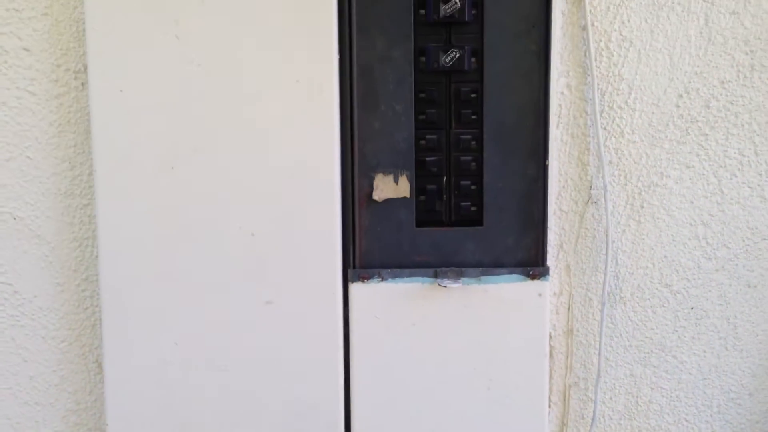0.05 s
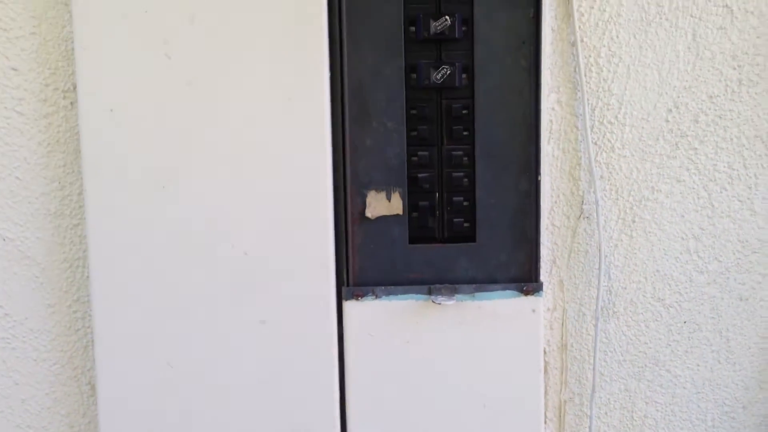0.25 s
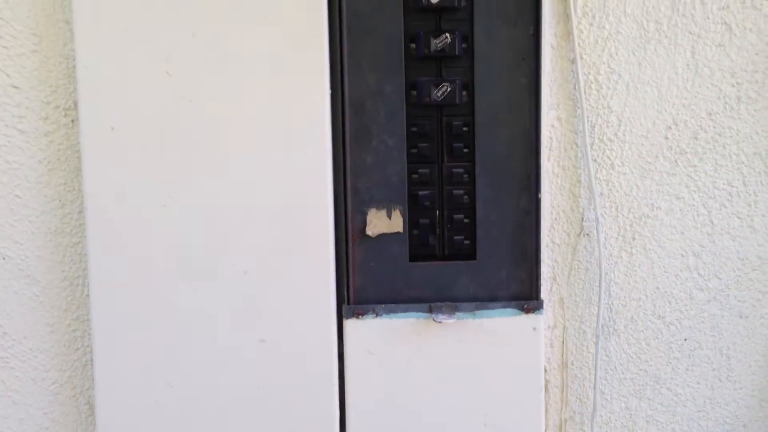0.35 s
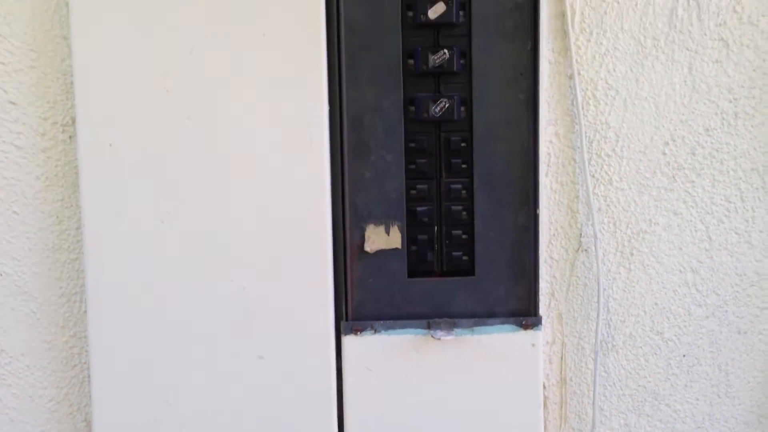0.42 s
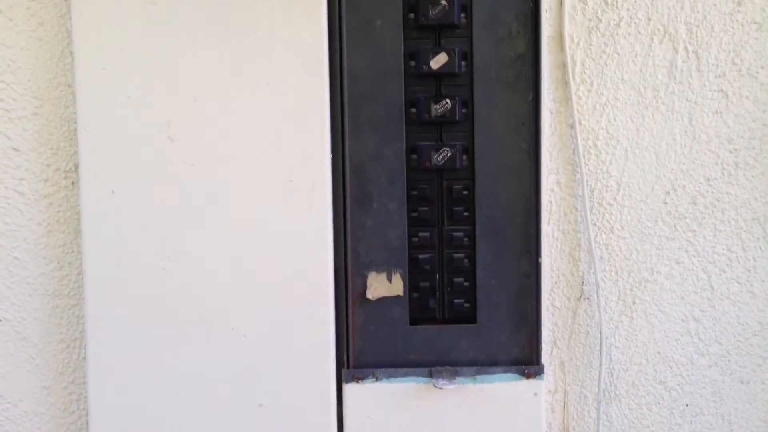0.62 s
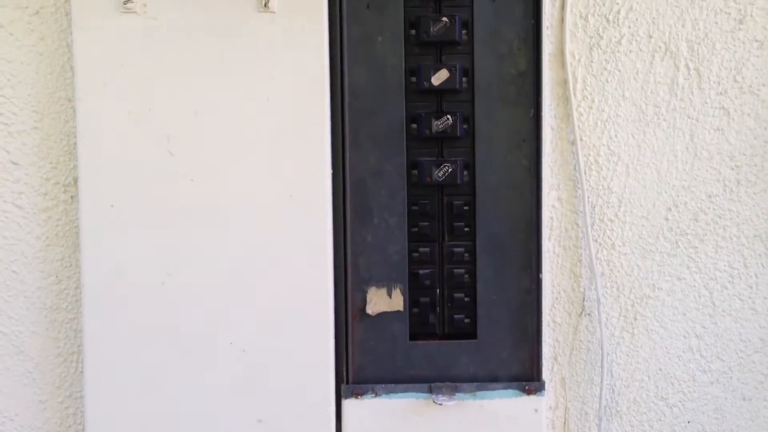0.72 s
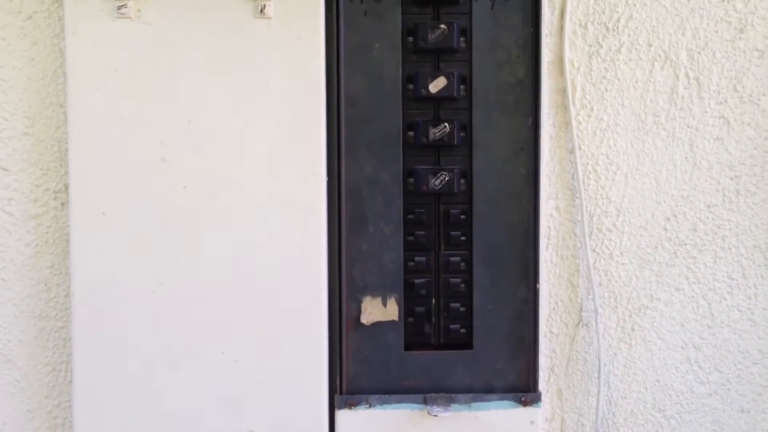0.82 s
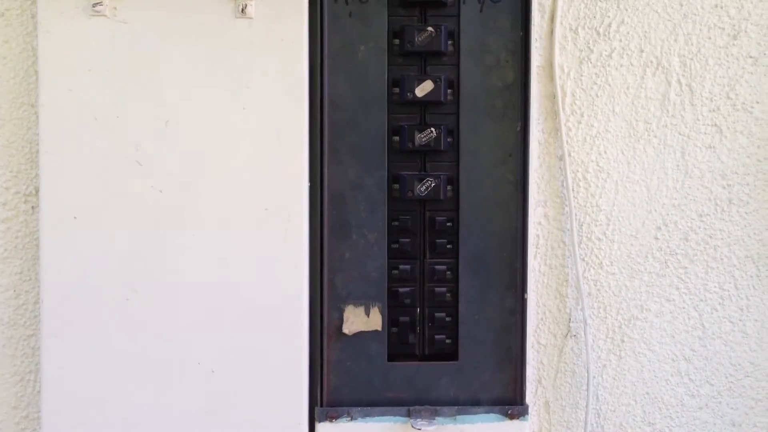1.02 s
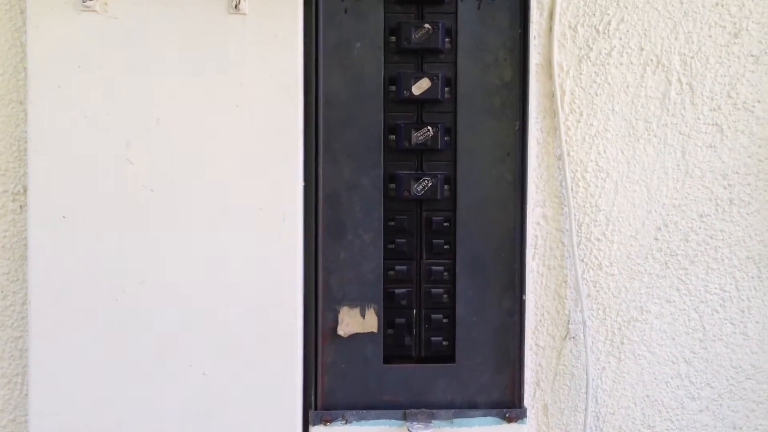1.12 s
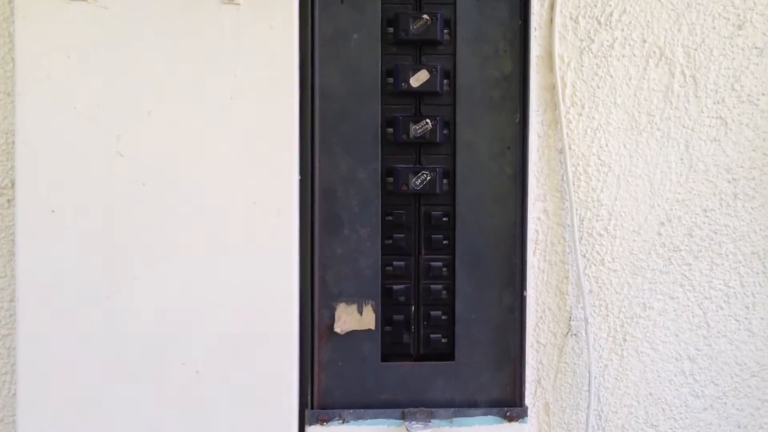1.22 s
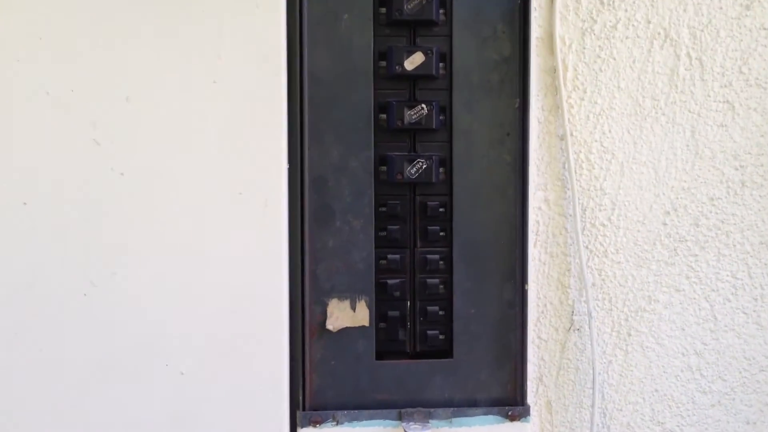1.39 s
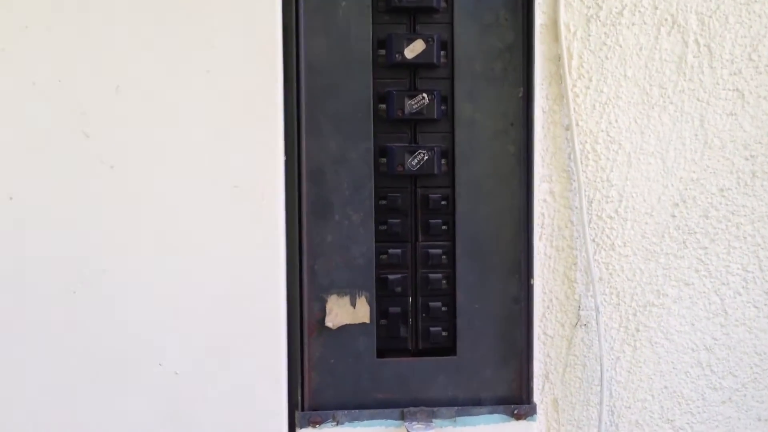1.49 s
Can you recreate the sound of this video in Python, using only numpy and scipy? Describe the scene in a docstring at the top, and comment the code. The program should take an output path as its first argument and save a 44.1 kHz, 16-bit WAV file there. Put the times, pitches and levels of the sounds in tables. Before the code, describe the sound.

A catch in a steel breaker panel snaps home with one sharp, bright clack, ringing high as the box briefly rattles. Very faint handling scuffs follow. The panel is close, with quiet outdoor air and distant traffic behind.

```python
"""A part snaps home in a steel breaker panel on an outside wall. First a faint tick sounds in quiet outdoor
air, over distant traffic and the wavering drone of a far engine. At 0.23 s the stiff catch gives a bright
double snap and rings high; just after, the sheet-steel box takes the blow and rattles for a moment. As it dies
away, faint scuffs of handling follow, and near 0.8 s low hums of the far engine swell up a little."""
import sys
import numpy as np
from scipy import signal
from scipy.fft import rfft, irfft, next_fast_len
from scipy.io import wavfile
from scipy.ndimage import uniform_filter1d, map_coordinates

SR = 44100
rng = np.random.default_rng(int(sys.argv[2]) if len(sys.argv) > 2 else 0)


def wav_out(sig):
    """Save sig, one row per channel (or a flat mono array), as 16-bit PCM at SR to the path in sys.argv[1]."""
    wavfile.write(sys.argv[1], SR, np.round(np.clip(np.atleast_2d(sig).T, -1, 1) * 32767).astype(np.int16))


N = 68355

# hits of the catch (t/s, level/dB)
CATCH_HITS = [(.2305, -25), (.2316, -19), (.2337, -20), (.2463, -36), (.2722, -43), (.2842, -37)]
# ringing modes of the catch (f/Hz, level/dB, t60/s)
CATCH_MODES = [(4823, -7, .13), (4895, -8, .13), (5233, -2, .11), (5542, -26, .32), (5762, -13, .15),
               (6182, 0, .115), (6745, -17, .16), (7230, -16, .12), (7390, -14, .12), (8559, -20, .1)]
# EQ of its crack and of its sizzling tail (f/Hz, level/dB)
CRACK_EQ = [(100, -45), (1000, -34), (1800, -23), (3000, -30), (4000, -25), (4900, -3), (5800, 0),
            (6500, -2), (7400, -11), (8500, -25), (12500, -24), (16000, -42)]
SIZZLE_EQ = [(60, -25), (200, 0), (1000, -18.5), (1800, -4), (3600, -12), (5000, -5.5), (7200, 0.5),
             (9800, -15.5), (11800, 1), (14000, -12), (16000, -50)]
def catch(crack_db=16, sizzle_db=-11.5, ring_db=-6.5):
    """The small stiff catch cracks on each contact and rings high."""
    def snap(db):
        crack = amp(crack_db) * hardness(db, CATCH_HITS) * transient(CRACK_EQ, t60=0.0024)
        return crack + amp(sizzle_db) * steel_tail(SIZZLE_EQ)
    snaps = play(CATCH_HITS, snap)
    return snaps + amp(ring_db) * ring(CATCH_MODES, CATCH_HITS, fill_s=.0015, scatter_db=1.5)


# blows on the box (t/s, level/dB)
BOX_HITS = [(.2466, -25.5), (.2510, -32), (.2570, -30), (.2726, -28.5), (.2848, -29), (.2890, -34)]
# ringing modes of the box (f/Hz, level/dB, t60/s)
BOX_MODES = [(226, -5, .24), (305, -13, .25), (418, -6, .18), (498, -11, .2), (786, -12, .2),
             (1050, 3, .11), (1168, -25, .9), (1404, -14, .22), (1901, -5, .17), (2108, -4, .12),
             (2256, -18, .38), (2453, -3, .11), (2620, -7, .11), (2879, -5, .12), (3143, -4, .12),
             (3772, -4, .12), (4110, -10, .13)]
# EQ of its clank and of its sheet-metal tail (f/Hz, level/dB)
CLANK_EQ = [(100, -46), (400, -42), (1200, -18.5), (2400, 2), (3400, -4), (4600, -12.5), (6500, -5.5),
            (9000, -26), (16000, -47)]
SHEET_EQ = [(40, -43), (130, 5.5), (400, 2), (650, 0.5), (1250, -4), (2000, 4), (2800, 0), (4200, -2.5),
            (6300, 2.5), (9500, -14.5), (13000, -32), (16000, -45)]
def box(clank_db=22, sheet_db=-5, ring_db=-7.5, attack_s=0.0018):
    """Each blow clanks, then spreads through the sheet steel and gives the snap its body."""
    attack = 1 - np.exp(-np.arange(N) / SR / attack_s)
    def blow(db):
        clank = amp(clank_db) * hardness(db, BOX_HITS) * transient(CLANK_EQ, t60=0.0036)
        return clank + amp(sheet_db) * attack * steel_tail(SHEET_EQ)
    rattle = play(BOX_HITS, blow)
    return rattle + amp(ring_db) * ring(BOX_MODES, BOX_HITS, fill_s=.022, scatter_db=1.0)


def transient(eq, t60):
    """One contact, energy 1: a clean click and, equally strong, the grit of rough surfaces."""
    grit = rng.standard_normal(N) * fade(np.arange(N) / SR, t60)
    push = signal.unit_impulse(N) + grit / np.linalg.norm(grit)
    hit = minimum_phase(push, eq)
    return hit / np.linalg.norm(hit)


def hardness(db, hits):
    """Transient gain: a soft hit loses an extra half dB of bite per dB below the hardest."""
    return amp(.5 * (db - max(level for s, level in hits)))


def ring(modes, hits, fill_s, scatter_db):
    """Every hit feeds energy into the modes, which then ring out."""
    t = np.arange(N) / SR
    push = t * fade(t, fill_s)
    energy = play(hits, lambda db: amp(db) * push / push.sum())
    out = np.zeros(N)
    for hz, db, t60 in modes:
        stored = signal.lfilter([1], [1, -fade(2 / SR, t60)], energy)
        envelope = amp(db - scatter_db * rng.standard_normal()) * np.sqrt(stored)
        out += envelope * np.sin(2 * np.pi * (hz * t + rng.random()))
    return out


# decay time of steel across the spectrum (f/Hz, t60/s)
STEEL_DECAY = [(100, 0.15), (400, 0.24), (2000, 0.17), (6000, 0.11), (12000, 0.07)]
def steel_tail(eq):
    """Countless weak modes of steel blur into a noisy tail; the highs die first."""
    hz, t, spectrum = signal.stft(noise(eq), SR, nperseg=256)
    decay = fade(t, along(STEEL_DECAY, hz)[:, None])
    return signal.istft(spectrum * decay, SR, nperseg=256)[1][:N]


# light touches before the snap (t/s, level/dB)
TICK_HITS = [(.0336, -51), (.0360, -27), (.0408, -36)]
# their thin, bright EQ (f/Hz, level/dB)
TICK_EQ = [(300, -30), (1500, -26), (2800, -11), (4500, -22), (7300, 0), (9500, -16), (15000, -38)]
def tick(tail_db=-31.5):
    """Light touches run together into one tick with a trace of steel ring."""
    return play(TICK_HITS, lambda db: transient(TICK_EQ, t60=0.0028) + amp(tail_db) * steel_tail(TICK_EQ))


# handling after the snap (t/s, length/s, level/dB)
SCUFF_CUES = [(.448, .012, -72), (.59, .010, -68), (.615, .015, -72), (.712, .015, -69), (.775, .025, -69),
              (.858, .008, -66), (1.132, .012, -70), (1.372, .008, -68), (1.462, .04, -66)]
# EQ of the scuffs (f/Hz, level/dB)
SCUFF_EQ = [(500, -19), (2000, 1), (4500, 4), (7500, 1), (15000, -22)]
def scuffs():
    """Faint handling: short, soft-edged swells of bright noise."""
    t = np.arange(N) / SR
    envelope = sum(amp(db) * np.exp(-2 * ((t - s) / length) ** 2) for s, length, db in SCUFF_CUES)
    return noise(SCUFF_EQ) * envelope


# pitch and level ride of the far engine (t/s, f/Hz, level/dB)
ENGINE_RIDE = [(0, 200, -52), (.09, 200.1, -56.5), (.18, 206.1, -83), (.30, 220, -54), (.38, 211.2, -52),
               (.52, 211.1, -51), (.68, 217.9, -60), (.82, 232, -60.5), (.98, 224.7, -51.5),
               (1.15, 224, -63.5), (1.36, 229, -53.5), (1.55, 232.5, -70)]
def engine(octave_db=-14, waver_db=1.0, jitter_hz=1.52):
    """A far engine drones on one wavering note with a weak octave."""
    hz, db = curves(ENGINE_RIDE)
    phase = 2 * np.pi * np.cumsum(hz + jitter_hz * wobble(25)) / SR
    tone = unit(np.sin(phase) + amp(octave_db) * np.sin(2 * phase))
    return amp(db + waver_db * wobble(18)) * tone


# three fader points of the hums (t/s)
HUM_CUES = [0.783, 0.89, 1.68]
# low hums of the far engine (f/Hz, then level/dB at each fader point)
ENGINE_HUMS = [(75.6, -84, -75.5, -67), (149.76, -73, -60.5, -68.5)]
def engine_hums(jitter_hz=2, waver_db=2):
    """The far engine's lower notes fade up as low, unsteady hums."""
    out = np.zeros(N)
    for hz, *levels in ENGINE_HUMS:
        phase = 2 * np.pi * np.cumsum(hz + jitter_hz * wobble(19.5)) / SR
        fader_db = np.interp(np.arange(N) / SR, HUM_CUES, levels)
        out += unit(np.sin(phase)) * amp(fader_db + waver_db * wobble(14))
    return out


# EQ of the outdoor bed (f/Hz, level/dB)
AIR_EQ = [(15, -68), (25, -21), (43, -29.5), (64, -21.5), (114, -15.5), (141, -13.5), (185, -4.5),
          (223, -6), (363, -13.5), (591, -12.5), (714, -15), (840, -11.5), (2610, -29.5), (14400, -38.5),
          (16000, -43)]
# swell of traffic in its lows and mids (t/s, level/dB)
TRAFFIC_RIDE = [(0, -0.5), (.2, 0.5), (.45, 1.5), (.7, 1.5), (1.1, 0), (1.55, 2.5)]
def outdoor_air(level_db=-55, patchy_db=1.5, crossover_hz=2500):
    """A bed of open air, patchy in time and pitch, that swells with distant traffic."""
    spectrum = signal.stft(noise(AIR_EQ), nperseg=512)[2]
    patches = uniform_filter1d(rng.standard_normal(spectrum.shape), size=5, axis=0)
    patches = unit(uniform_filter1d(patches, size=14, axis=1))
    air = unit(signal.istft(spectrum * amp(patchy_db * patches), nperseg=512)[1][:N])
    low = filtered(air, lambda hz: 1 / (1 + (hz / crossover_hz) ** 2))
    swell = amp(curves(TRAFFIC_RIDE)[0])
    return amp(level_db) * (air - low + low * swell)


# traffic bands (f/Hz, half-width/Hz, start level/dB, end level/dB)
TRAFFIC_BANDS = [(257, 23, -69, -58), (876, 100, -63.5, -73.5), (1450, 180, -74, -68)]
def traffic():
    """Distant traffic drones in narrow noise bands, each on a slow fade up or down."""
    out = np.zeros(N)
    for centre, width, start_db, end_db in TRAFFIC_BANDS:
        band = filtered(rng.standard_normal(N), lambda hz: 1 / (1 + ((hz - centre) / width) ** 2))
        out += unit(band) * amp(np.linspace(start_db, end_db, N))
    return out


def play(hits, sound):
    """Trigger a fresh sound at each (t/s, level/dB)."""
    out = np.zeros(N)
    for s, db in hits:
        start = max(0, round(s * SR))
        out[start:] += amp(db) * sound(db)[:N - start]
    return out


def amp(db):
    """Decibels to gain."""
    return 10 ** (np.asarray(db) / 20)


def unit(x):
    """Normalise to rms 1."""
    return x / np.sqrt(np.mean(x ** 2) + 1e-20)


def fade(t, t60):
    """Exponential decay, 60 dB down at t60."""
    return np.exp(-np.log(1000) * t / np.maximum(t60, 1e-4))


def along(points, hz):
    """Read (f/Hz, value) breakpoints on a log frequency axis."""
    freqs, values = np.transpose(points)
    return np.interp(np.log(hz + 1), np.log(freqs + 1), values)


def curves(rows):
    """One automation curve for each column after the time."""
    times, *columns = np.transpose(rows)
    return [np.interp(np.arange(N) / SR, times, column) for column in columns]


def wobble(rate):
    """Smooth random modulation, rate points a second."""
    return map_coordinates(rng.standard_normal(256), [np.arange(N) * rate / SR], mode="mirror")


def noise(eq):
    """Noise shaped by an EQ, rms 1."""
    return unit(filtered(rng.standard_normal(N), lambda hz: amp(along(eq, hz))))


def filtered(x, response):
    """Zero-phase filter; response gives the gain at each frequency."""
    size = next_fast_len(N + SR // 2)
    return irfft(rfft(x, size) * response(np.fft.rfftfreq(size, 1 / SR)), size)[:N]


def minimum_phase(x, eq, size=4096):
    """EQ with no pre-ring, so attacks stay sharp."""
    gain = amp(along(eq, np.fft.rfftfreq(size, 1 / SR)))
    cepstrum = irfft(np.log(gain))
    cepstrum[1:size // 2] *= 2
    cepstrum[size // 2 + 1:] = 0
    return signal.fftconvolve(x, irfft(np.exp(rfft(cepstrum))))[:N]


def scene():
    """Mono mix: the panel up front, the outdoor ambience behind."""
    panel = catch() + box() + tick() + scuffs()
    return (panel + engine() + engine_hums() + outdoor_air() + traffic())[None]


def record(dry):
    """The microphone rolls off the deep bass and keeps nothing above its band limit."""
    low_cut_hz, top_hz = 37, 15700
    low_cut = signal.butter(2, low_cut_hz, "highpass", fs=SR, output="sos")
    return filtered(signal.sosfilt(low_cut, dry[0]), lambda hz: hz < top_hz)[None]


dry = scene()
out = record(dry)
wav_out(out)
```